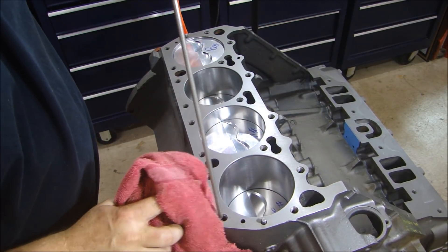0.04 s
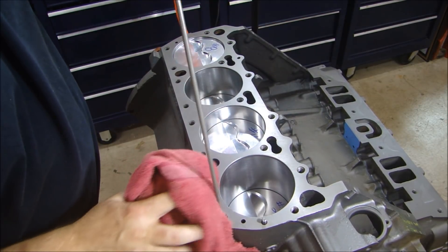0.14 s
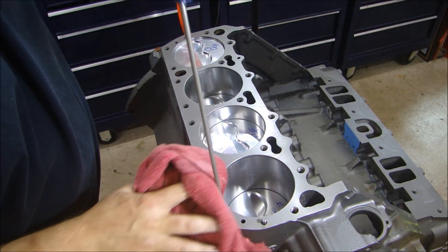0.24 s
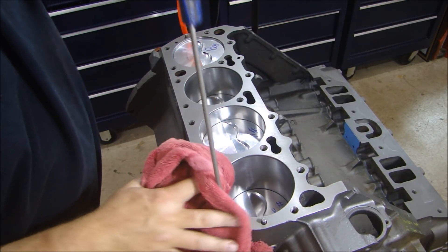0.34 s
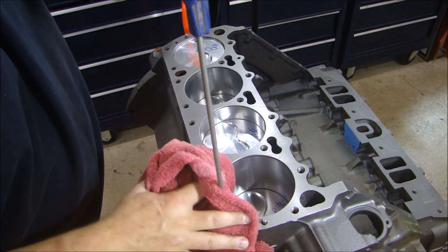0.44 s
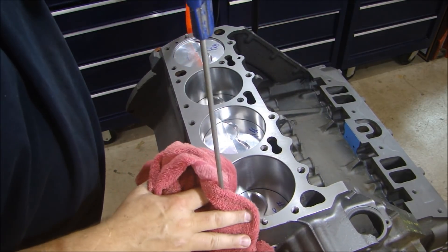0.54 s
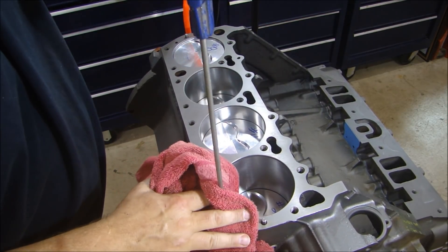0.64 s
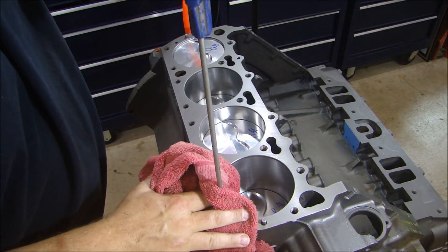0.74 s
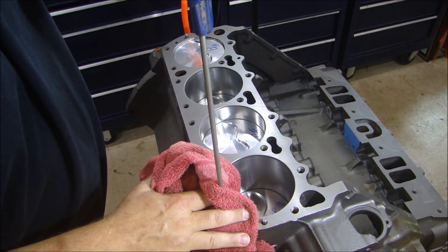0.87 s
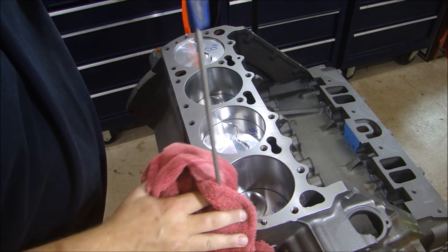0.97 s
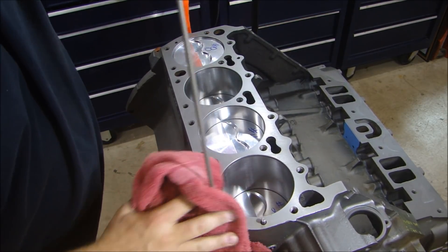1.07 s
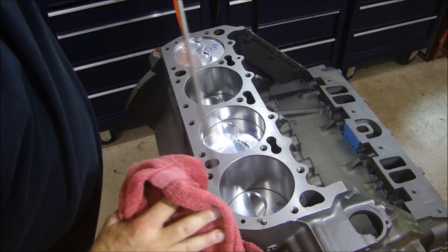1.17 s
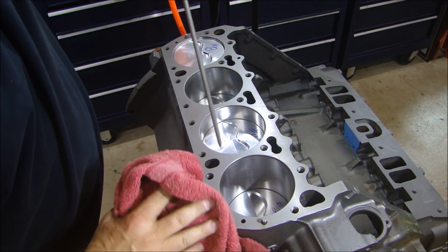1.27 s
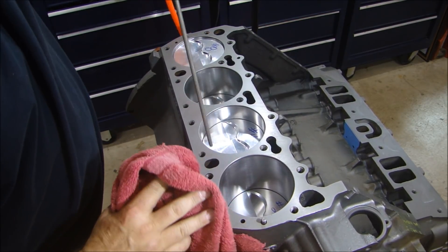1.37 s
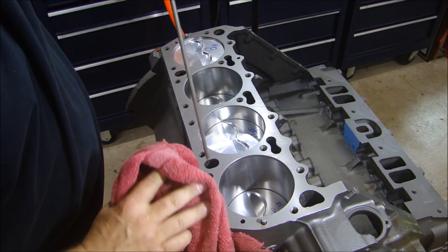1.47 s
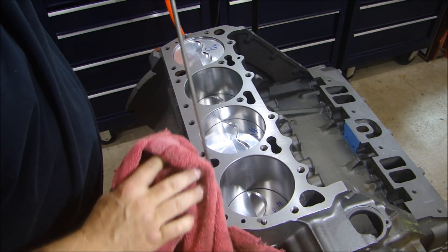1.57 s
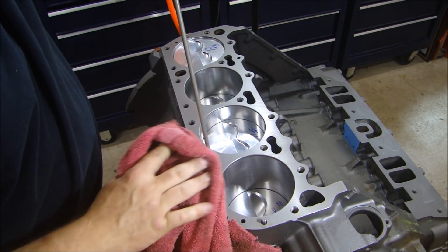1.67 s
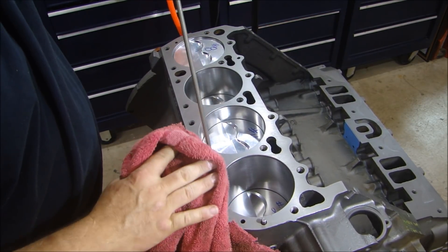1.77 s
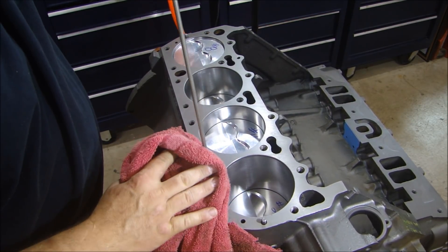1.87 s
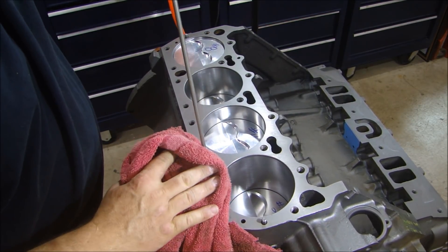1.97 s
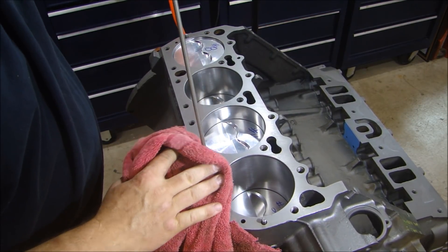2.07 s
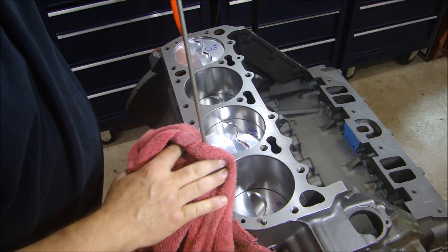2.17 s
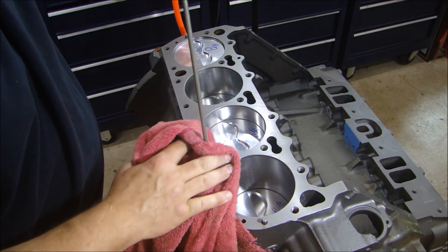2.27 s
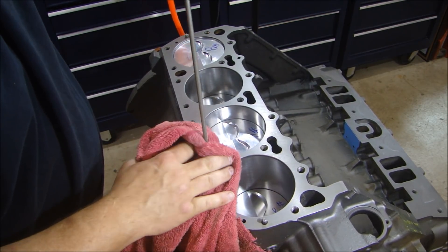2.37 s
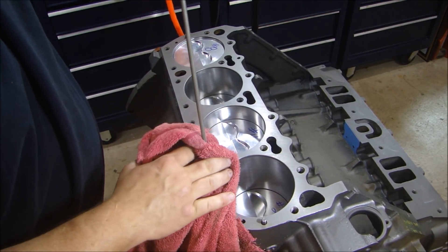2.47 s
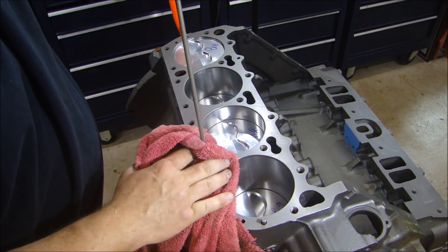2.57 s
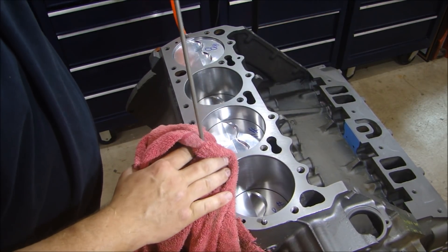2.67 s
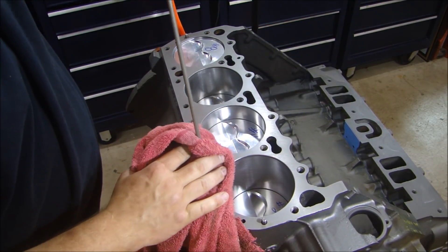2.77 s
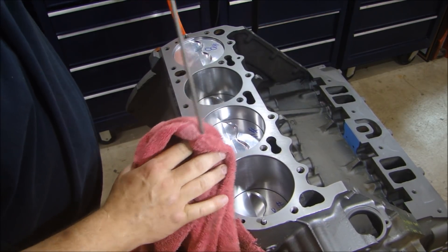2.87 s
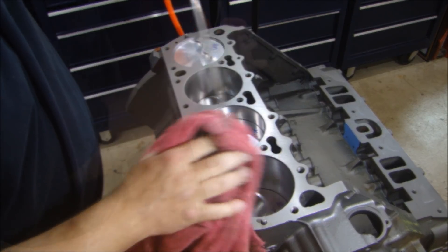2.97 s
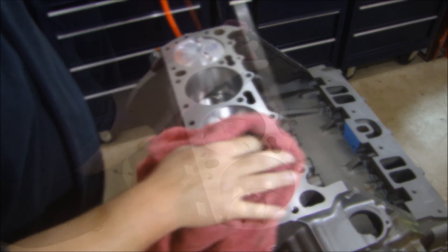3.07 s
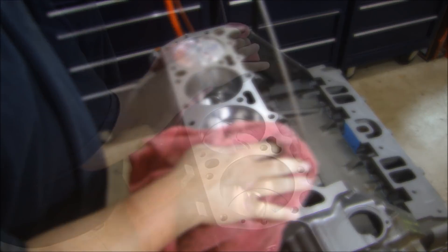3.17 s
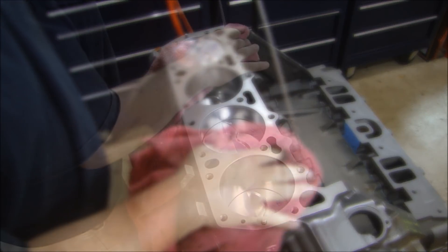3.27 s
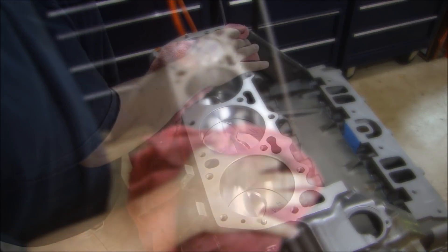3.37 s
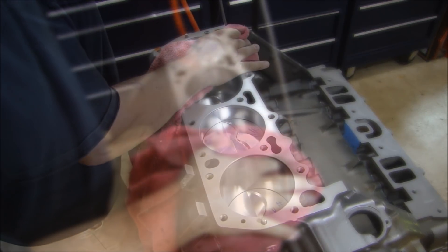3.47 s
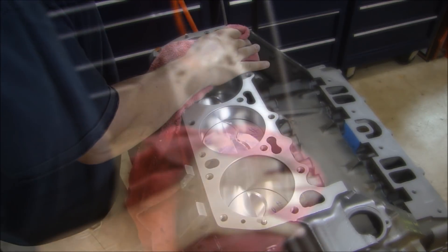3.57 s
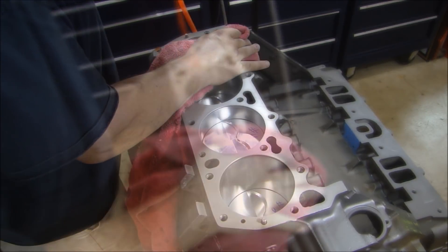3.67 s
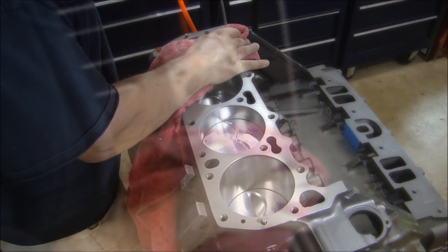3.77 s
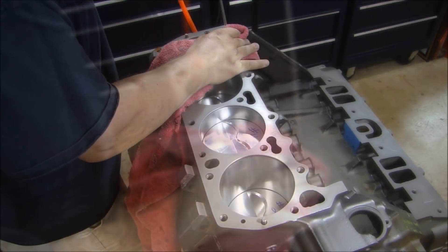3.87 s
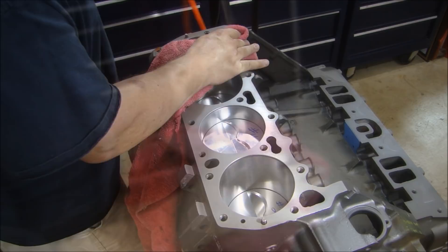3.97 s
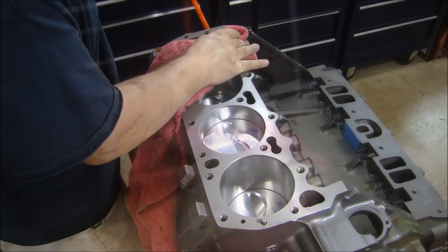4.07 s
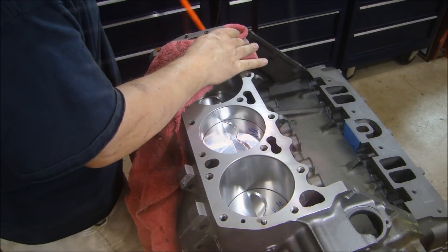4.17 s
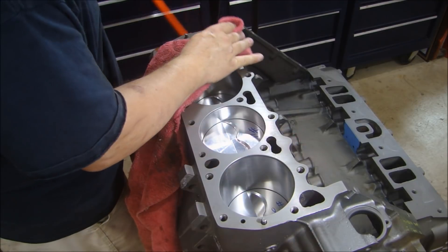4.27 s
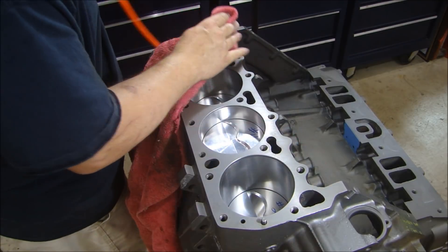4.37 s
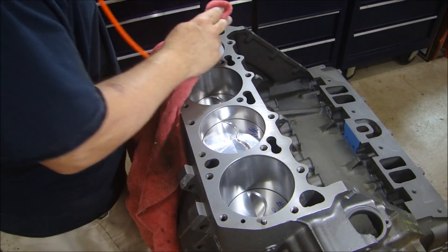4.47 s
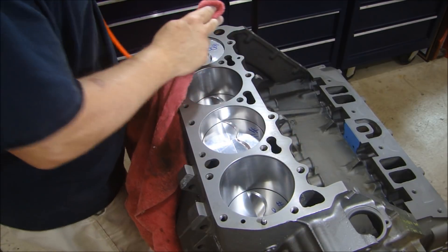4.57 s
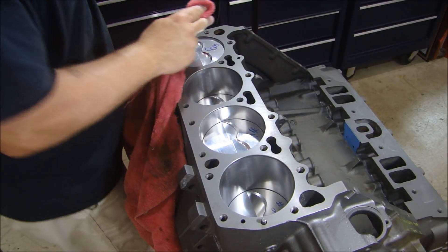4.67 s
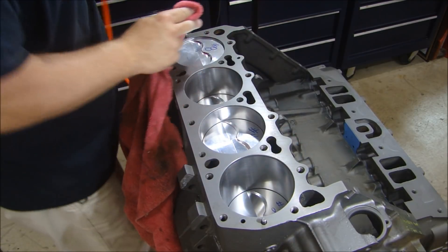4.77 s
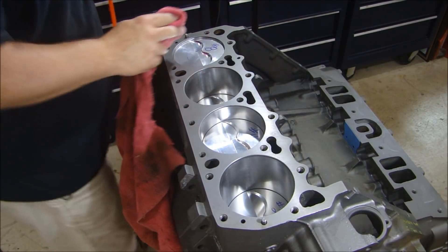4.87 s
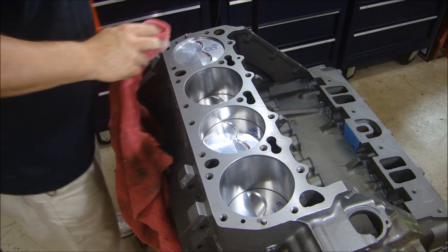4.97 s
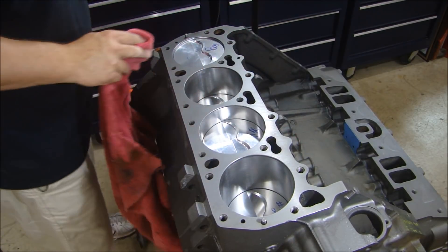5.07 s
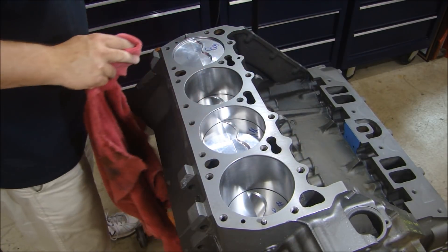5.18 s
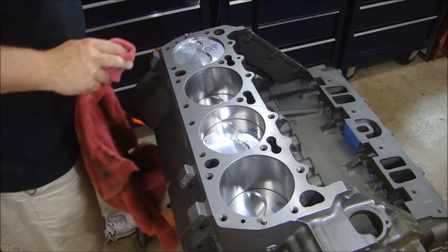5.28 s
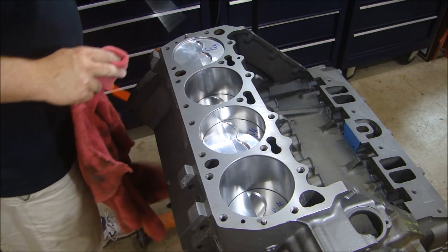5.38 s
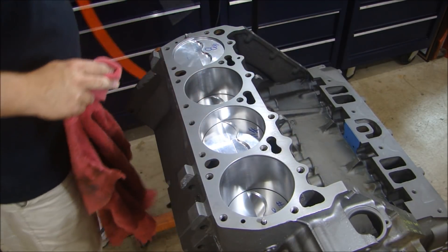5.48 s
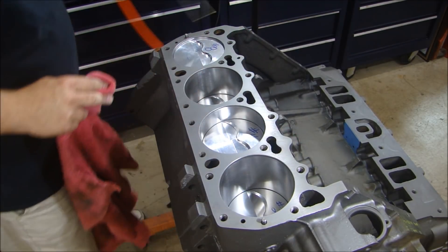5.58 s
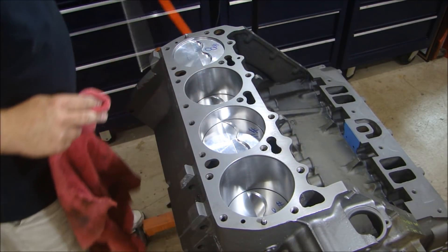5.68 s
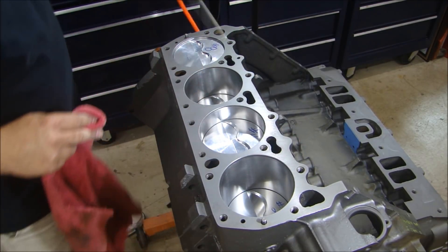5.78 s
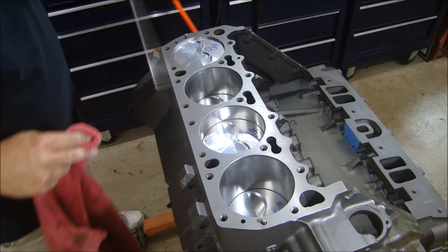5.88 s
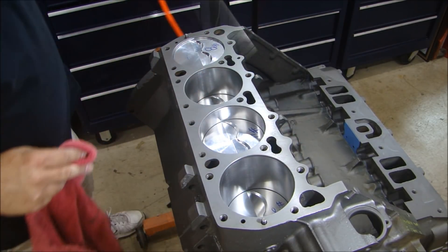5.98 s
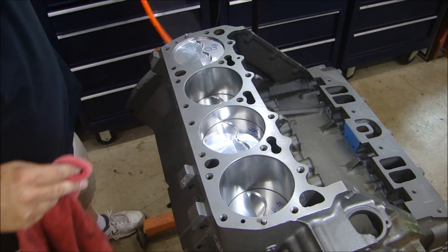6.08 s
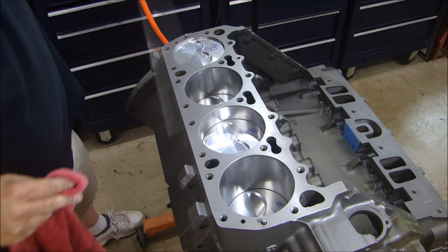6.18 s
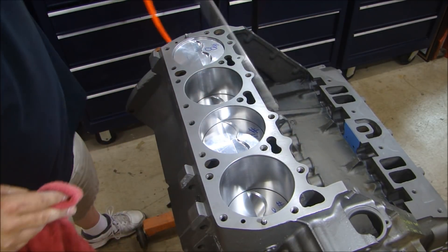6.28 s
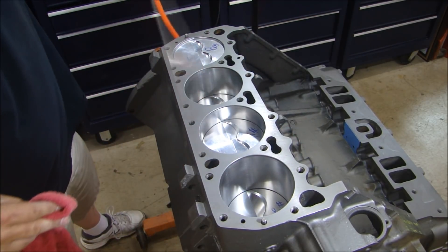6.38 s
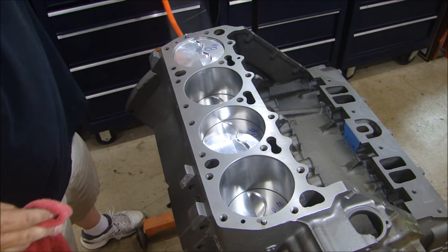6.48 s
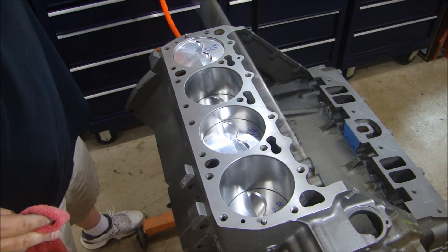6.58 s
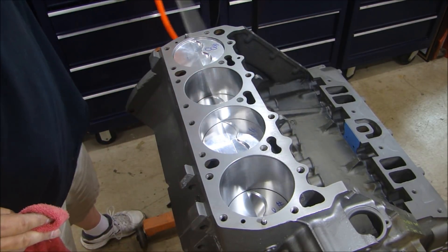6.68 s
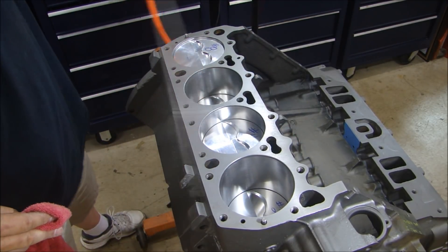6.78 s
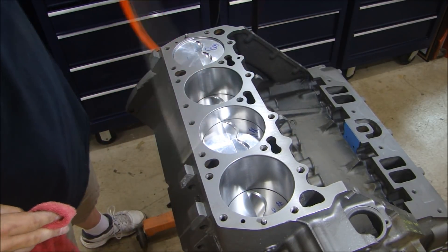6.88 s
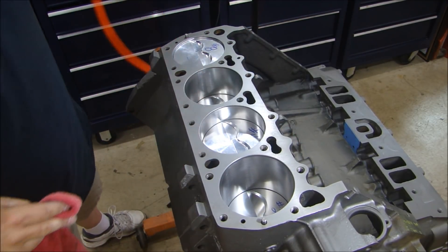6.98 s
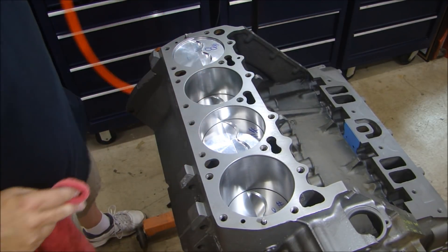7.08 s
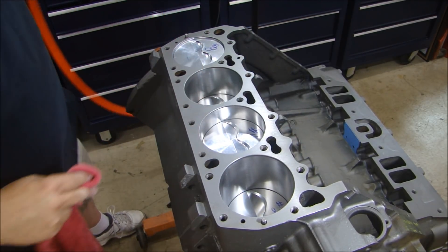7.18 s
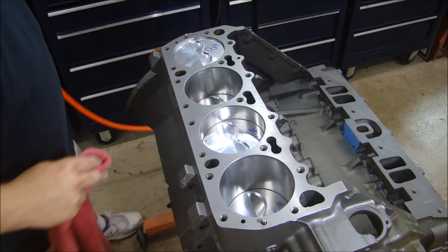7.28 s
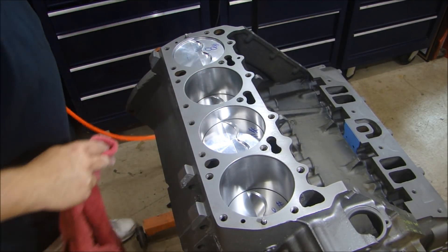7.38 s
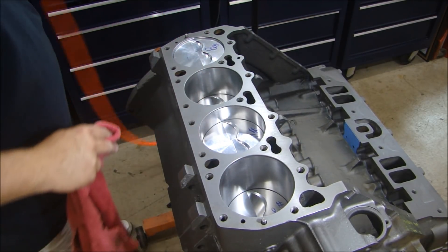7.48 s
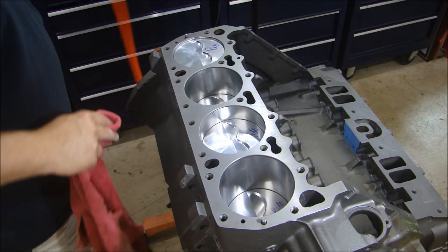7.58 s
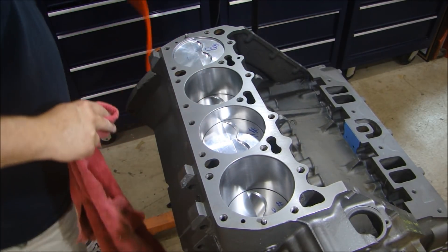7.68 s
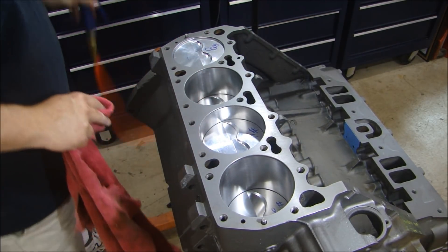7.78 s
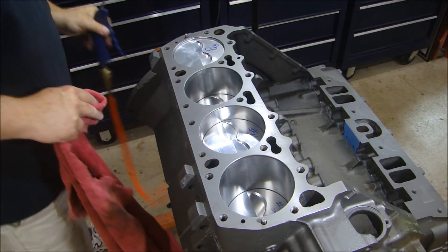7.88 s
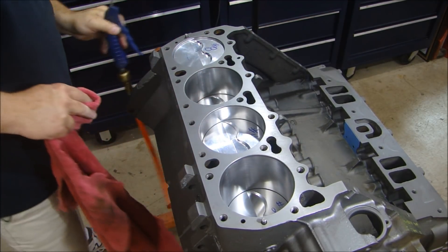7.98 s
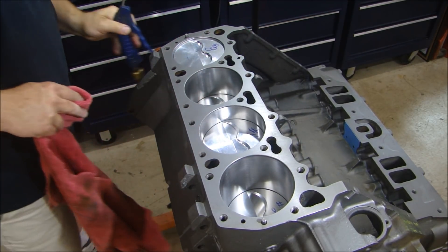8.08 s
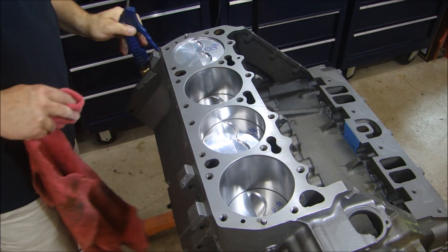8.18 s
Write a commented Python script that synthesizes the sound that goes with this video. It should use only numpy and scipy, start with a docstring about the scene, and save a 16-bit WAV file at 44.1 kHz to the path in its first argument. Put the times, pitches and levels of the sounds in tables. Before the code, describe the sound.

Compressed-air blow gun ticks into metal holes and hisses in hard separate blasts, then flutters and whistles through a rag; a hose pops off loudly.

```python
"""Blow gun on an engine block

A blow gun clears the bolt holes of an engine block through a rag, in a garage.
The steel nozzle ticks into each hole: filtered noise with a brief ring. The blasts are turbulent noise
in three bands: the rag rumbles, the hole roars and the jet hisses; then the rag flaps and a sine whistles.
The nozzle clanks once on the block, and at the end the hose coupling leaks, pops off and drops:
cracks and narrow rings of noise with a dense, decaying echo."""
import sys
import numpy as np
from scipy import signal
from scipy.fft import rfft, irfft, next_fast_len
from scipy.io import wavfile
from scipy.ndimage import uniform_filter1d

SR = 44100
rng = np.random.default_rng(int(sys.argv[2]) if len(sys.argv) > 2 else 0)


def wav_record(signal):
    """Record a signal, one row per channel, as 16-bit PCM in the file named by sys.argv[1]."""
    frames = np.transpose(np.atleast_2d(signal))
    bounded = np.clip(frames, -1, 1)
    # unit amplitude maps onto the largest positive 16-bit level
    quanta = np.round(bounded * 32767).astype(np.int16)
    wavfile.write(sys.argv[1], SR, quanta)


N = 363384
TIME = np.arange(N) / SR

# the colour that the hole and the rag give each stretch of air, by name: pitch_hz, relative_db_per_hz
AIR_COLOURS = { "first hole": [(88, -75), (150, -59), (258, -36), (354, -31), (435, -16.5), (477, -21),
               (565, -8), (747, -14.5), (989, -17.5), (1580, -7.5), (1870, -5.5), (2760, -2), (3860, -5.5),
               (11200, -15), (13000, -32)], "second hole": [(88, -89), (150, -61), (202, -62), (248, -26),
               (396, -35), (427, -27.5), (565, -14.5), (1150, -19.5), (1750, 1), (2400, 0), (3860, -5.5),
               (6200, -12.5), (7020, -8), (8150, -15.5), (10800, -11), (13000, -25.5)],
               "third hole": [(88, -68), (150, -33), (354, -15), (534, -17.5), (720, -13.5), (805, -19),
               (935, -13), (1730, -4.5), (2760, 3), (3720, -2.5), (4010, 1.5), (4570, -3.5), (8460, -7.5),
               (11000, -4), (13000, -21)], "far hole": [(88, -76), (150, -45), (374, -16), (451, -29),
               (575, -9.5), (747, -18), (820, -4.5), (1190, -13), (2420, 0), (4490, -4), (5410, -9),
               (10800, -15), (13000, -21.5)], "open jet": [(88, -90), (150, -60), (239, -13.5), (460, -13),
               (565, -5.5), (1070, -14), (1260, -13), (2010, -19), (2290, -14.5), (3390, -15.5),
               (6760, -13.5), (10400, -7), (13000, -15)], "loose rag": [(88, -56), (150, -45.5),
               (248, -12.5), (368, -10), (477, -20), (544, -8.5), (747, -9), (820, -5.5), (1070, -13),
               (1550, 0.5), (2010, -3), (2290, 2.5), (4010, -5.5), (11200, -3.5), (13000, -11.5)],
               "flapping rag": [(100, -65.5), (250, -9), (700, -4.5), (1100, -3), (1600, 4.5), (2600, 8),
               (4000, 5.5), (7000, 2.5), (11000, 5), (12300, 1.5), (13200, -12)]}
# how alike the two channels are, for near sounds: pitch_hz, left_right_correlation
NEAR_LIKENESS = [(50, .55), (200, 0.68), (700, 0.71), (2200, 0.72), (4500, 0.47), (10000, 0.41)]
# the same for the wide sound of the room: pitch_hz, left_right_correlation
ROOM_WIDTH = [(40, -0.11), (200, 0.69), (600, 0.71), (1200, 0.41), (2200, -0.021), (4500, 0.13),
              (9000, -0.21)]
# the nozzle's clank and the coupling's pop: start_s, crack_db, echo_db, echo_hold_s, echo_t60_s, ring_db
LOUD_BANGS = [(4.612, -10.5, -26, 0.059, 0.68, -28), (7.603, -12.5, -22, 0.059, 0.84, -39.5)]


def amp(db):
    """Decibels to gain."""
    return 10 ** (np.asarray(db) / 20)


def evened(x):
    """Scales to rms 1; of a stereo pair, its middle."""
    return x / np.sqrt(np.mean(np.atleast_2d(x).mean(0) ** 2) + 1e-20)


def read(points, hz):
    """Reads a table on a log-frequency axis."""
    f, value = np.transpose(points)
    return np.interp(np.log(hz + 1), np.log(f + 1), value)


def add(mix, s, sound):
    """Adds a stereo sound to the mix at time s."""
    part = mix[:, max(round(s * SR), 0):][:, :sound.shape[1]]
    part += sound[:, :part.shape[1]]


def freqs(x):
    """The frequencies of a sound's spectrum."""
    return np.fft.rfftfreq(x.shape[-1], 1 / SR)


def tinted(x, gain):
    """Filters by a gain for each frequency."""
    return irfft(rfft(x) * gain, x.shape[-1])


def noise(count, likeness):
    """White stereo noise whose channels are alike by the given table."""
    a, b = rng.standard_normal((2, count))
    same = np.clip(read(likeness, freqs(a)), -.99, .99)
    middle = tinted(a, np.sqrt((1 + same) / 2))
    side = tinted(b, np.sqrt((1 - same) / 2))
    return np.array([middle + side, middle - side])


def wobble(count, size):
    """A random waver of rms 1, smoothed over size samples."""
    return evened(uniform_filter1d(rng.standard_normal(count), size))


def resonance(f, hz, width_hz):
    """A resonance of peak gain 1 that falls to half gain at the edges of its width."""
    return 1 / (1 + ((f - hz) / width_hz * 2) ** 2)


def shaped(x, rule):
    """Applies a gain in dB that is a rule of frequency and time."""
    hz, t, z = signal.stft(x, SR, nperseg=512)
    z = z * amp(rule(hz[:, None], t[None]))
    return signal.istft(z, SR, nperseg=512)[1][:, :x.shape[1]]


def patches(hz, t, size, count):
    """Random patches of level, size bins wide and count frames long."""
    field = rng.standard_normal((hz.size, t.size))
    field = uniform_filter1d(uniform_filter1d(field, size, 0), count, 1)
    return field / field.std()


def room_tone(pan_db=1, tone_db=-47.5, sink_s=.12, boom_db=-32.5, boom_rise_s=0.053, boom_t60=1.85):
    """The workshop's steady rush dips around the blasts; its low resonances boom after the coupling's pop."""
    # the weight of the rush and the boom: pitch_hz, relative_db_per_hz
    tone_colour = [(24, -78), (40, -45), (131, -22), (188, -21), (228, -6.5), (429, -4.5), (631, -8),
                   (930, -7), (1270, -7.5), (1580, -10.5), (1830, -8.5), (2020, -9.5), (2170, -12.5),
                   (13000, -34)]
    # the rush sinks and comes back: start_s, end_s, depth_db, recovery_s
    tone_dips = [(0.46, 1.02, -9.5, 0.15), (2.11, 2.853, -12, .2), (3.556, 4.39, -5.5, 0.057),
                 (5.246, 7.19, -13.5, 0.25)]
    x = noise(N, ROOM_WIDTH)
    rush = evened(tinted(x, amp(read(tone_colour, freqs(x)))))
    dips = 0
    for start, end, db, recovery in tone_dips:
        dips = dips + db * np.clip(np.minimum((TIME - start) / sink_s, 1 - (TIME - end) / recovery), 0, 1)
    age = TIME - LOUD_BANGS[-1][0]
    boom = np.clip(age / boom_rise_s, 0, 1) * amp(boom_db - 60 * np.maximum(age - boom_rise_s, 0) / boom_t60)
    return rush * np.hypot(amp(tone_db + dips), boom) * amp([[-pan_db], [pan_db]])


def garage(x, delay_s=0.012):
    """The diffuse echo of the garage: decaying noise, each band dying at its own speed."""
    # how long each band lingers: pitch_hz, t60_s
    room_decay = [(200, 0.19), (1000, 1), (2300, 0.94), (6000, 0.93), (12000, 0.61)]
    tail = shaped(noise(SR, ROOM_WIDTH), lambda hz, t: -60 * t / read(room_decay, hz))
    # silent for the delay, then fading in over as long again
    tail *= np.clip(TIME[:SR] / delay_s - 1, 0, 1)
    return signal.fftconvolve(x.mean(0)[None], tail / np.linalg.norm(tail[0]), axes=1)[:, :N]


def thump(s, db, length):
    """A short, dull thump: dark noise under a bell-shaped envelope."""
    # the dullness of the thumps: pitch_hz, relative_db_per_hz
    thump_colour = [(20, -2.5), (60, -8), (200, -14.5), (500, 4), (1200, -11.5), (4000, -51)]
    x = noise(8192, NEAR_LIKENESS)
    t = (np.arange(x.shape[1]) - x.shape[1] / 2) / SR
    dull = evened(tinted(x, amp(read(thump_colour, freqs(x)))))
    return s + t[0], dull * amp(db) * np.exp(-2 * (t / length) ** 2)


def ring(s, rise, t60, hz, width_hz, db):
    """A resonance heard as a narrow band of noise that swells and dies."""
    x = noise(SR, ROOM_WIDTH)
    t = np.arange(SR) / SR
    band = evened(tinted(x, resonance(freqs(x), hz, width_hz)))
    return s, band * np.minimum(t / rise, 1) * amp(db - 60 * np.maximum(t - rise, 0) / t60)


def bang(row, colour, modes, crack_t60=0.029, crack_tilt_db=2, treble_loss=0.25, grain_db=-0.1):
    """A crack, then the garage's dense echo with the struck part ringing in it."""
    s, crack_db, echo_db, hold, t60, ring_db = row
    t = np.arange(SR) / SR
    f = freqs(t)
    tint_db = read(colour, f)
    # the crack is brighter than its echo
    crack = evened(tinted(noise(SR, NEAR_LIKENESS), amp(tint_db + crack_tilt_db * np.log2(1 + f / 2000))))
    crack = crack * amp(crack_db - 60 * t / crack_t60)
    echo = evened(tinted(noise(SR, ROOM_WIDTH), amp(tint_db)))

    def fade(hz, age):
        """Air absorbs the treble first."""
        return -60 * np.maximum(age - hold, 0) / t60 * (1 + treble_loss * (hz / 10000) ** 2)

    # a very slight random waver of the echo's level
    echo = shaped(echo, fade) * amp(grain_db * wobble(SR, size=60))
    rings = sum(ring(s, 0.013, decay, hz, width, ring_db + db)[1] for hz, width, db, decay in modes)
    return s, crack + amp(echo_db) * echo + rings


def tick(s, db, hz, t60, ring_db=2, ring_width_hz=1100, trim_db=-10.5, contact_db=1, contact_s=0.00069):
    """A knock or tick of metal: a graze, a sharp contact, its rebound and their brief ring."""
    # the tint of the metal: pitch_hz, relative_db_per_hz
    tick_colour = [(150, -31), (600, -3), (2000, 0.5), (4600, 1), (6300, -5.5), (8200, -4.5),
                   (10000, -10.5), (13000, -16)]
    graze_s, graze_db = .005, -15  # metal grazes just before it lands
    rebound_s, rebound_db = 0.0097, -9
    x = noise(8192, NEAR_LIKENESS)
    f, t = freqs(x), np.arange(x.shape[1]) / SR
    metal = amp(read(tick_colour, f)) * (1 + amp(ring_db) * resonance(f, hz, ring_width_hz))
    x = evened(tinted(x, metal))
    touch = amp(contact_db) * np.exp(-t / contact_s) + amp(-60 * t / max(t60, .005))
    hits = ((0, graze_db), (graze_s, 0), (graze_s + rebound_s, rebound_db))
    touches = [amp(level) * np.interp(t - delay, t, touch, left=0) for delay, level in hits]
    # the touches add as power
    return s - graze_s, x * amp(db + trim_db) * np.linalg.norm(touches, axis=0)


def jet(colour, count, ripple_db=2.3, swirl_db=1.18):
    """Turbulent air: reflections off the block ripple its spectrum and eddies make it swirl."""
    # how the jet leans between the channels: pitch_hz, left_minus_right_db
    jet_balance = [(300, -2.5), (2200, -2.5), (4500, -1.4), (9000, 0.1)]

    def unevenness(f, t):
        """Long narrow ripples and short broad swirls."""
        return ripple_db * patches(f, t, size=2, count=40) + swirl_db * patches(f, t, size=12, count=3)

    air = shaped(noise(count, NEAR_LIKENESS), unevenness)
    f = freqs(air)
    return tinted(air, amp(read(colour, f) + np.outer([.5, -.5], read(jet_balance, f))))


def surge(s, length, hiss_db, whistle_db, waver=0.0338, rise_share=0.56, spit_db=2, pan_db=2.0):
    """A puff breaks out under the rag, quickly, and blows the hole like a flute."""
    whistle_hz, middling_db = 2264, -24  # the hole's note in a middling surge
    hz_per_db, droop = 9, .04  # stronger surges blow it sharper; it droops by this share as a puff weakens
    air = evened(jet(AIR_COLOURS["flapping rag"], count=8192))
    t = (np.arange(air.shape[1]) - air.shape[1] / 2) / SR
    puff = np.exp(-2 * (t / (length * np.where(t < 0, rise_share, 1))) ** 2)
    note_hz = whistle_hz + hz_per_db * (hiss_db - middling_db)
    hz = note_hz * (1 - droop * (1 - puff) + waver * wobble(len(t), size=120))
    whistle = np.sqrt(2) * np.sin(2 * np.pi * np.cumsum(hz) / SR) * amp([[-pan_db], [pan_db]])
    breath = amp(hiss_db) * air + amp(whistle_db) * whistle
    return s + t[0], breath * amp(spit_db * wobble(len(t), size=120)) * puff


def blast(start, end, rise, fall, rumble_db, roar_db, hiss_db, onset_db, roar_sag, hiss_sag, colour,
          rumble_swell_share=0.76, hiss_onset_share=0.059, sputter_db=0.57, flutter_db=.5,
          rumble_trim_db=-1.5, roar_trim_db=-3.0, hiss_trim_db=-.5, low_hz=1200, high_hz=3300):
    """A stretch of air fades in, holds and fades out: one jet split into the rag's rumble, the roar and hiss."""
    # the hole roars up as the nozzle shifts in it: centre_s, length_s, rise_db
    swells = [(2.705, 0.15, 4.5), (2.78, 0.025, 3.5), (3.943, 0.065, 5), (5.547, 0.068, 5.5)]
    # the rag clamps down and chokes the flow: centre_s, length_s
    chokes = [(5.722, 0.014), (5.98, 0.0067), (6.07, 0.0056), (6.233, 0.047), (6.467, 0.011)]
    onset_s, choke_db = 0.075, -6.5  # the onset's extra level, up or down, fades this quickly
    t = np.arange(0, end - start + fall, 1 / SR)
    air = jet(AIR_COLOURS[colour], count=next_fast_len(len(t) + int(SR / 10)))
    f = freqs(air)
    above_low, above_high = (1 / (1 + (edge / (f + 1)) ** 10) for edge in (low_hz, high_hz))
    shares = (1 - above_low, above_low - above_high, above_high)
    swell = sum(db * np.exp(-((start + t - s) / length) ** 2) for s, length, db in swells)
    onset = onset_db * np.exp(-(np.maximum(t - rise, 0) / onset_s) ** 2)
    # a negative sag makes the level climb
    rumble = rumble_db + rumble_trim_db + rumble_swell_share * swell
    roar = roar_db + roar_trim_db + swell + onset - roar_sag * t
    hiss = hiss_db + hiss_trim_db + hiss_onset_share * onset - hiss_sag * t
    out = 0
    for share, level in zip(shares, (rumble, roar, hiss)):
        out = out + evened(tinted(air, share))[:, :len(t)] * amp(level)
    unrest = sputter_db * wobble(air.shape[1], size=130) + flutter_db * wobble(air.shape[1], size=1500)
    fade = np.clip(np.minimum(t / rise, (t[-1] - t) / fall), 0, 1)
    choke = choke_db * sum(np.exp(-((start + t - s) / length) ** 2) for s, length in chokes)
    return start, out * amp(unrest[:len(t)] + choke) * fade


def scene(air_room_db=-8, tick_room_db=-7, bang_pan_db=0.46, cut_hz=110):
    """Room tone, thumps, bangs, ticks and blasts in the garage."""
    # dull low thumps, one of them the click of the edit cut: centre_s, level_db, length_s
    low_thumps = [(3.064, -46, 0.0093), (3.885, -52, .03), (4.463, -38, 0.0049), (4.614, -41, 0.0049),
                  (5.905, -40, .015), (7.615, -50, 0.036)]
    # the coupling's thin leak, the dropped hose's hollow ring and the loose fitting's chinks:
    # start_s, rise_s, t60_s, pitch_hz, width_hz, level_db
    hose_rings = [(7.2, 0.12, 3.4, 7520, 130, -64.5), (7.69, 0.0044, 0.69, 740, 130, -25.5),
                  (7.935, 0.0045, 0.42, 7070, 240, -37), (7.996, .004, 0.32, 2980, 450, -38)]
    # the tints of the clank and the pop, one list each: pitch_hz, relative_db_per_hz
    bang_colours = [
        [(59, -82), (100, -65), (326, -35), (451, -47), (565, -37), (849, -27), (1360, -13), (1630, -6.5),
         (2350, -5), (3680, -2), (8310, -11.5), (11500, -10.5), (13000, -36.5)],
        [(29, -70), (50, -49), (118, -15), (370, -21), (500, -1.5), (603, -12.5), (779, -16), (895, -8.5),
         (1270, -10.5), (1640, -6.5), (5890, -11), (11000, -19.5), (13000, -31)],
    ]
    # what rings after the clank and the pop, one list each: pitch_hz, width_hz, db_above_ring_level, t60_s
    bang_modes = [
        [(1655, 62, -5, 0.67), (3724, 130, -0.5, 0.73), (4990, 840, 1, 0.7), (7360, 160, -6, 0.66)],
        [(493, 110, -2, .5), (780, 120, -2, 0.77), (1250, 230, 7, 0.56)],
    ]
    # knocks and ticks, nozzle on block, then the dropped hose and its fitting:
    # landing_s, level_before_trim_db, main_ring_hz, t60_s (at least 0.005)
    metal_knocks = [(.145, -19, 4200, 0.017), (.263, -21.5, 4300, 0.063), (.407, -18.5, 2410, 0.06),
                    (1.924, -30, 3100, .02), (1.933, -29.5, 3100, .035), (2.023, -21.5, 4200, 0.058),
                    (3.062, -28, 1790, 0.13), (3.149, -32, 10500, .03), (3.279, -21, 4000, 0.03),
                    (7.699, -9.5, 2000, .03), (7.905, -24, 2800, .02), (7.935, -21, 2290, 0.13),
                    (7.996, -15, 2860, 0.031), (8.176, -26.5, 1640, 0.028)]
    # the air sings in the hole during a blast: start_s, rise_s, t60_s, pitch_hz, width_hz, level_db
    hole_tones = [(2.125, .015, 0.35, 2060, 696, -23.5), (2.19, 0.063, 0.45, 3750, 1300, -30),
                  (2.635, 0.037, 0.28, 2220, 690, -22.5), (3.551, 0.012, 0.23, 2900, 500, -25),
                  (3.62, 0.048, 2, 5030, 140, -28.5), (3.985, 0.024, 0.39, 2190, 450, -25),
                  (4.04, .06, 2.6, 4600, 220, -30), (5.748, 0.0086, 0.077, 343, 110, -26.5),
                  (6.585, 0.013, 0.22, 3640, 180, -24), (6.59, 0.03, 0.19, 1226, 170, -22.5)]
    # the rag lifts and lets out a surge: centre_s, length_s, hiss_db, whistle_db
    rag_surges = [ (5.318, 0.034, -30.5, -24), (5.433, 0.012, -26.5, -21.5), (5.48, 0.011, -30.5, -19.5),
                  (5.535, 0.029, -32, -23.5), (5.636, .015, -20.5, -20.5), (5.68, 0.029, -33.5, -24),
                  (5.718, 0.022, -35, -26), (5.781, 0.04, -21, -29.5), (5.921, 0.021, -22, -45),
                  (5.955, 0.03, -21, -44), (6.018, 0.03, -22.5, -50), (6.046, 0.0049, -20, -27),
                  (6.089, .016, -23.5, -23), (6.13, 0.037, -23, -28), (6.158, .011, -25, -22),
                  (6.183, 0.03, -29, -26), (6.257, 0.013, -23, -20.5), (6.283, 0.0095, -25, -20.5),
                  (6.34, .02, -23.5, -21), (6.398, 0.033, -26, -29), (6.442, 0.0089, -27.5, -22),
                  (6.49, 0.041, -27.5, -36), (6.56, 0.022, -23.5, -39), (6.596, 0.032, -23.5, -32),
                  (6.69, 0.021, -29.5, -44), (6.772, .02, -23, -26)]
    # each stretch of air, some overlapping: start_s, end_s, rise_s, fall_s, rag_rumble_db, hole_roar_db,
    # jet_hiss_db (all three before trim), onset_db, roar_sag_db_per_s, hiss_sag_db_per_s, colour_name
    air_stretches = [ (.2, .243, 0.018, 0.016, -60, -44, -49, -0.5, 0, -42, "first hole"),
                     (.293, .332, 0.02, 0.076, -60, -38.5, -38.5, 4.5, 0, 0, "first hole"),
                     (.418, 1.008, 0.021, 0.0385, -39.5, -25.5, -25, 8.5, -2, 1, "first hole"),
                     (1.06, 1.11, 0.051, 0.018, -51, -33, -35, 0.5, 0, 6, "first hole"),
                     (2.12, 2.8, .015, .02, -41.5, -24.5, -22.5, 8.5, 2, 4, "second hole"),
                     (3.43, 3.54, .06, 0.014, -44, -49.5, -53.5, 4.5, -35, -89, "third hole"),
                     (3.537, 3.975, 0.031, 0.02, -42.5, -28.5, -22, 7.5, -4, -1, "third hole"),
                     (3.97, 4.461, 0.027, 0.0055, -45, -19, -22.5, -2.5, 15.5, 11.5, "far hole"),
                     (5.255, 5.425, 0.018, 0.035, -37.5, -27.5, -17, -0.5, 1, 16.5, "open jet"),
                     (5.424, 5.86, .006, 0.052, -32, -23, -24.5, 0.5, 9.5, -4.5, "loose rag"),
                     (5.885, 6.785, .025, 0.035, -38.5, -39, -29.5, -14, -13, -2.5, "flapping rag")]
    # an edit cuts the far-hole blast and its echo short, with a dull click:
    # cut_begins_s, cut_ends_s, air_silent_until_s
    edit_cut = (4.463, 4.466, 5.2)

    air, ticks, bangs, thumps = np.zeros((4, 2, N))
    layers = ((air_stretches, blast, air), (rag_surges, surge, air), (hole_tones, ring, air),
              (metal_knocks, tick, ticks), (hose_rings, ring, bangs), (low_thumps, thump, thumps))
    for table, source, mix in layers:
        for row in table:
            add(mix, *source(*row))
    for parts in zip(LOUD_BANGS, bang_colours, bang_modes):
        add(bangs, *bang(*parts))
    sounding = np.interp(TIME, edit_cut[:2], [1, 0]) + (TIME > edit_cut[2])
    air = (air + amp(air_room_db) * garage(air)) * sounding
    ticks = ticks + amp(tick_room_db) * garage(ticks)
    out = air + ticks + bangs * amp([[-bang_pan_db], [bang_pan_db]]) + room_tone()
    # a high-pass thins the bass of everything but the thumps
    highpass = signal.butter(2, cut_hz, "highpass", fs=SR, output="sos")
    return signal.sosfilt(highpass, out) + thumps


def record(dry, ceiling=0.85, edge_hz=12950):
    """The sharpest cracks overload the microphone softly; then a steep low-pass limits the band."""
    limited = dry / (1 + (dry / ceiling) ** 6) ** (1 / 6)
    lowpass = signal.firwin(161, edge_hz, window=("kaiser", 9), fs=SR)
    return signal.oaconvolve(limited, lowpass[None], "same")


dry = scene()
out = record(dry)
wav_record(out)
```